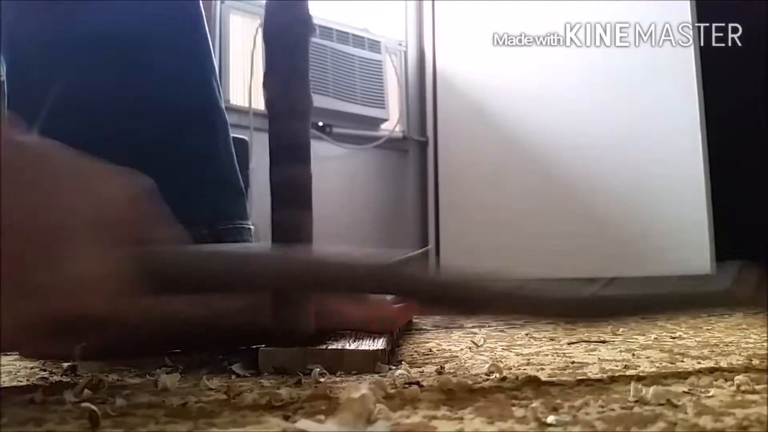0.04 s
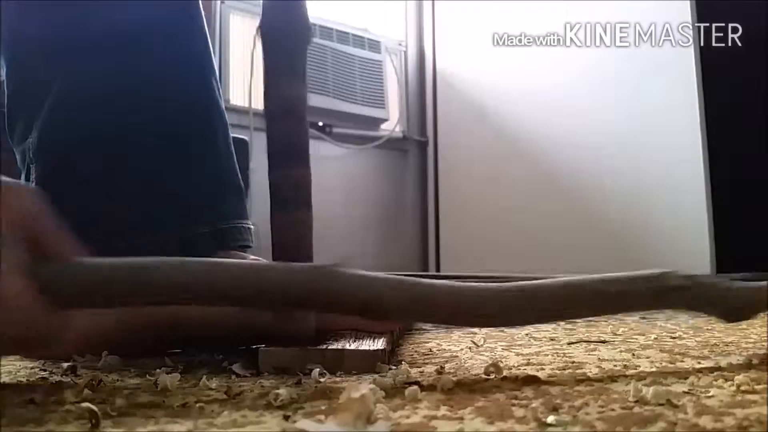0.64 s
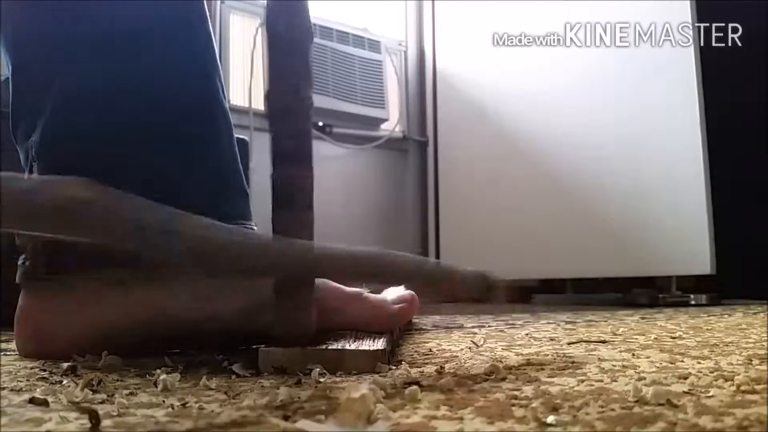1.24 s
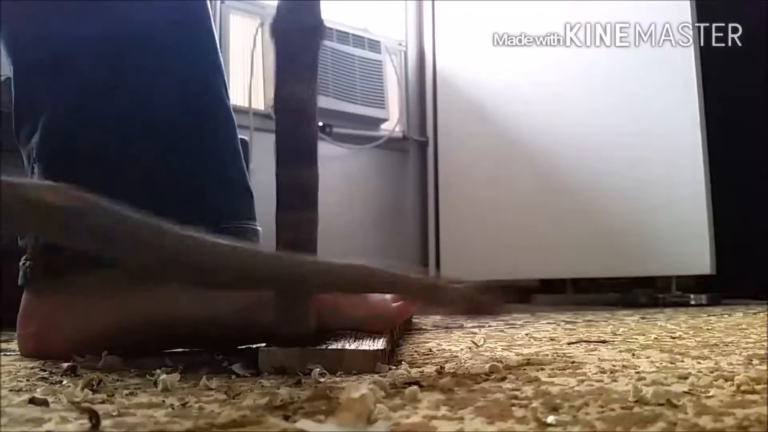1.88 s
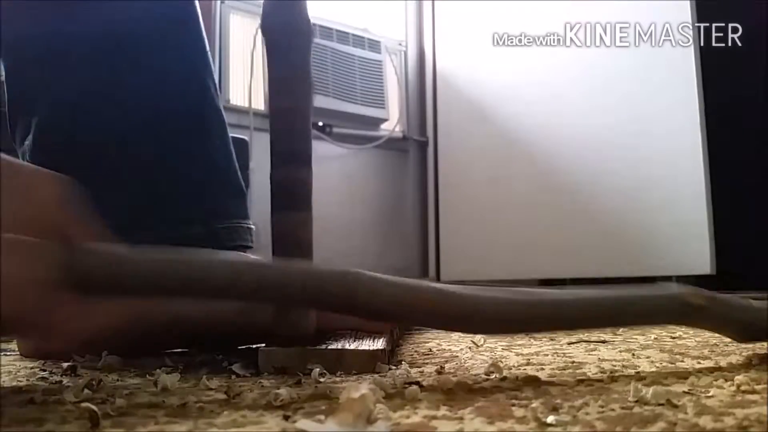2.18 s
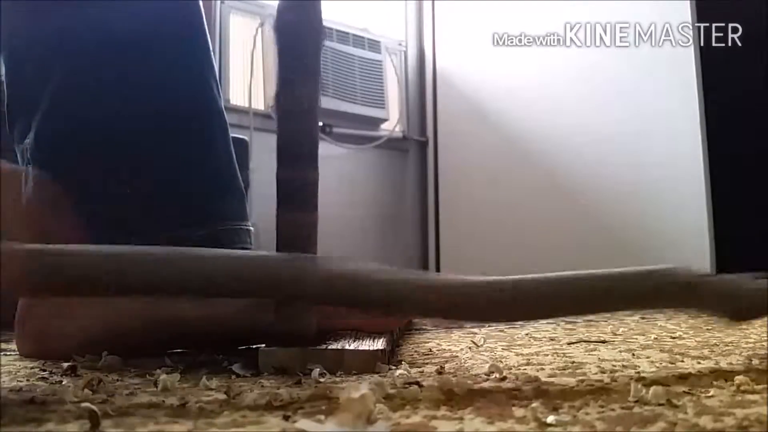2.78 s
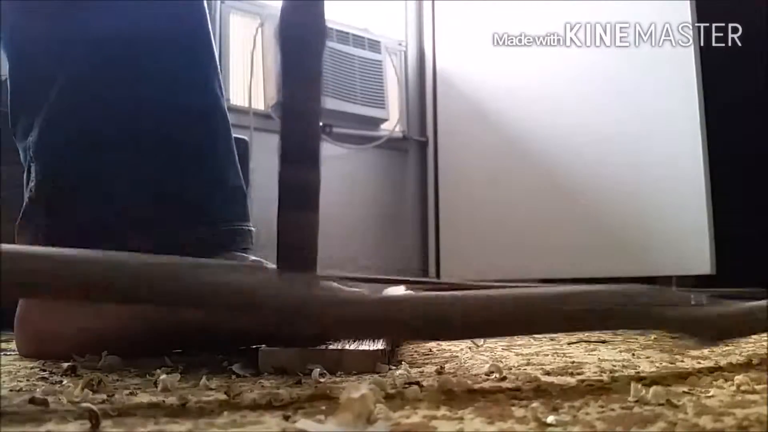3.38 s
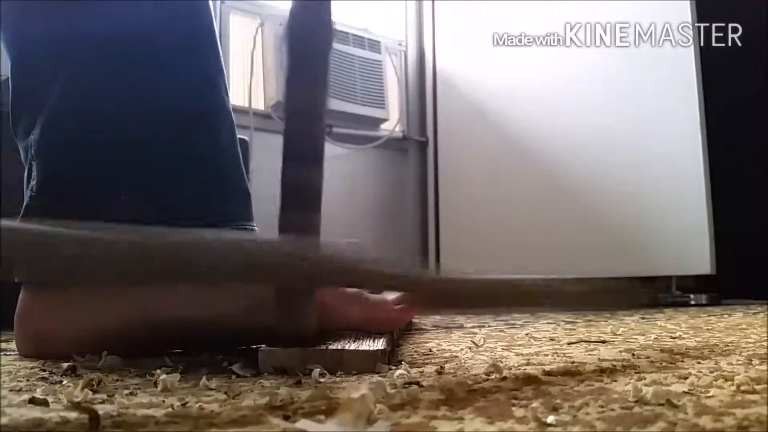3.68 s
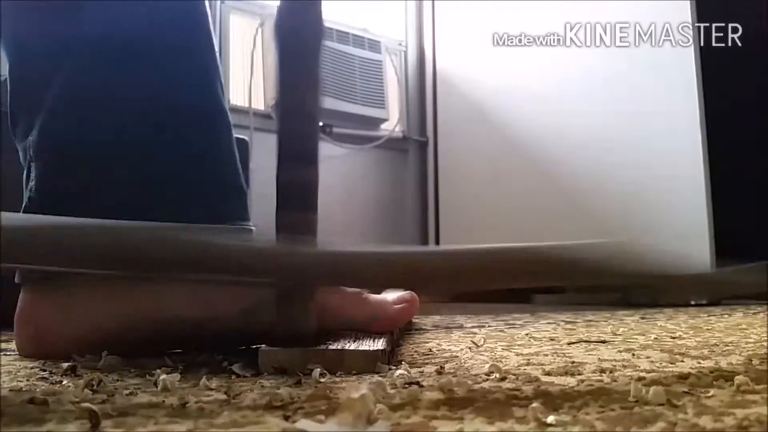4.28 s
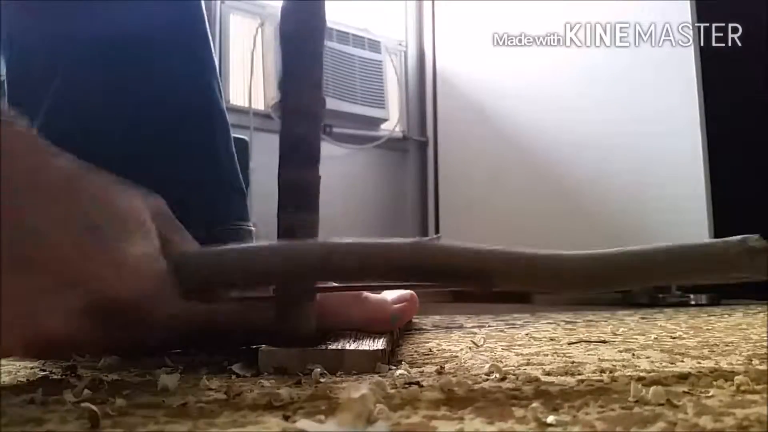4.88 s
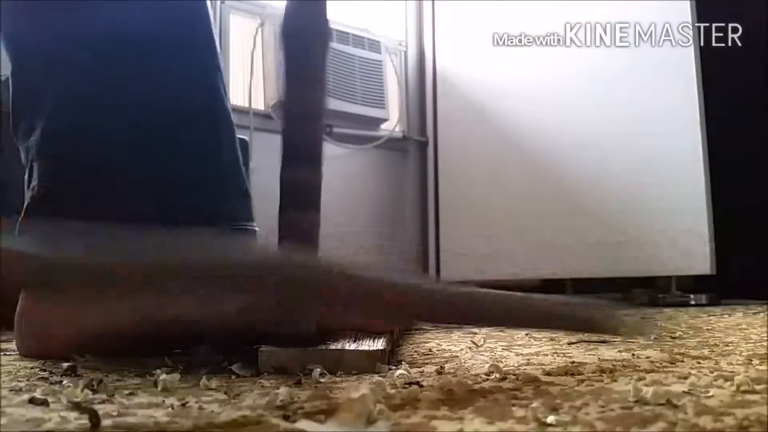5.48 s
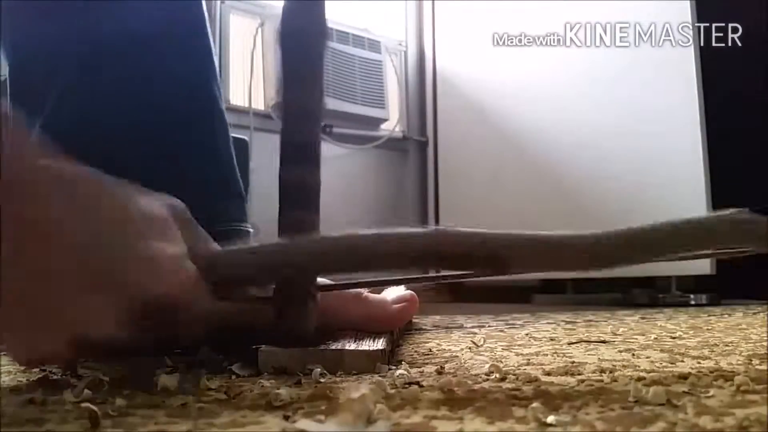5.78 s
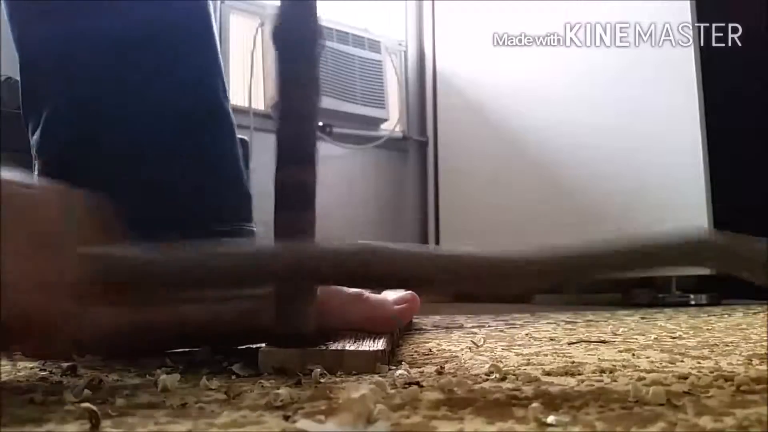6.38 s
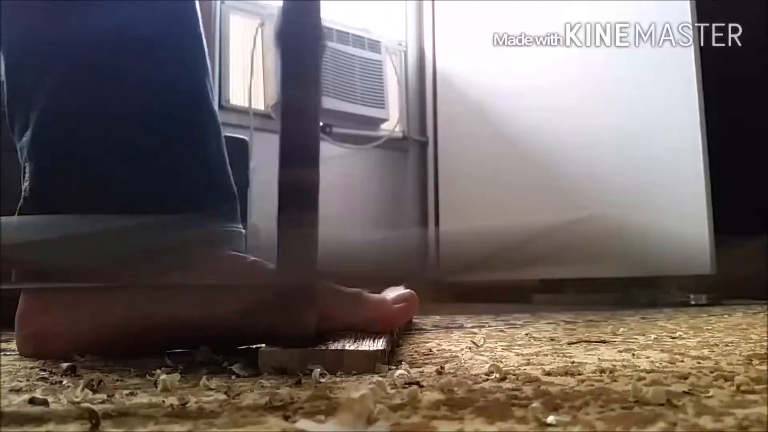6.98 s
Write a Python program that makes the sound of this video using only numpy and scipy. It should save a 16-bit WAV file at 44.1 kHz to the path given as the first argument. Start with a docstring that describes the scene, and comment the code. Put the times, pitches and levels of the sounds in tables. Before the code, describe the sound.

Rhythmic high squeaks of wood twisting on wood, one per bow stroke, over dusty rubbing and a low rumble in a small room.

```python
"""A bow drill is sawed back and forth on a wooden hearth board in a small room, near a phone on the floor.
From the start the spindle tip hisses in its dust and grabs about once a turn, squealing, while the board
rumbles and knocks on the floor. The first slow push strokes chatter, with a brief rest near 0.9 s.
The bow then quickens and squeals on every stroke; hard grabs sag in pitch and fall to the half tone, an
octave down, deepest near 5.7 s. At the end the bow eases off with a faint chatter and a last tiny squeak."""
import sys
import numpy as np
from scipy import signal
from scipy.fft import rfft, irfft
from scipy.io import wavfile

SR = 44100
rng = np.random.default_rng(int(sys.argv[2]) if len(sys.argv) > 2 else 0)


def dump(signal):
    """Clip the signal to [-1, 1] and save it as 16-bit WAV at the path in sys.argv[1]."""
    limited = np.clip(np.atleast_2d(signal).T, -1, 1)
    pcm = np.round(limited * 32767).astype(np.int16)
    wavfile.write(sys.argv[1], SR, pcm)


N = 310905
T = np.arange(N) / SR
FREQ = np.arange(N + 1) * SR / (2 * N)


# Squeal cues, each a first catch, a hard bite and a run of grabs:
# catch_s, bite_s, last_grab_s, grab_count, bite_pitch_hz, sag_hz, bite_level_db,
# then relative to the bite level: catch_db, last_grab_db, half_tone_db, octave_db, brightness_db
SQUEAL_CUES = [(-0.02, 0.012, 0.052, 2, 1933, 50, -19.5, -10, 0, -21, -13.5, -15),
               (0.591, 0.612, 0.64, 2, 2083, 16.5, -34.5, -10.5, -5, -9.5, -28, -14),
               (1.154, 1.213, 1.278, 3, 1767, -0.5, -23.5, -11, -17, 11, -16, -25),
               (1.459, 1.509, 1.591, 3, 2014, 99.5, -13, -17, -4, -5, -10.5, -11.5),
               (2.122, 2.165, 2.197, 2, 2056, 90, -16.5, -12, 2, -19, -13.5, -20),
               (2.443, 2.474, 2.538, 4, 1770, 180, -8.5, -7, -8, -2, -14, -22),
               (2.714, 2.751, 2.783, 2, 1998, 1, -11, -7.5, -1, -26, -10, -11),
               (2.997, 3.015, 3.12, 6, 1830, 65, -12.5, -12, -2.5, 0.5, -12, -23),
               (3.297, 3.312, 3.383, 4, 1978, 0, -13, -6.5, -7.5, -7, -6, -5),
               (3.592, 3.614, 3.66, 3, 1850, 10, -13, -3.5, -5, -6.5, -10, -14),
               (3.862, 3.9, 3.928, 2, 2103, -1, -14.5, -16, -8, -24, -14, -19),
               (4.156, 4.174, 4.236, 4, 1865, 40, -16, -4, -3, -3.5, -6.5, -12),
               (4.419, 4.442, 4.471, 2, 2135, 0, -17, -19.5, -16, -12, -18, -23),
               (4.642, 4.666, 4.76, 4, 1845, 190, -11, -8, -9, 0, -12, -19),
               (4.931, 4.952, 4.979, 2, 2076, 0, -11.5, -22.5, -3, -26, -8, -12.5),
               (5.17, 5.188, 5.259, 5, 1858, 50, -12.5, -2, -6, -1.5, -8.5, -14),
               (5.396, 5.431, 5.487, 3, 2043, 28.5, -12, -22, -4.5, -28.5, -6.5, -9),
               (5.6, 5.614, 5.717, 6, 1835, 590, -12.5, -3.5, -3, 1, -6.5, -14),
               (5.847, 5.864, 5.928, 3, 1853, -30, -15, -3, -6, -15, -3.5, -4),
               (6.085, 6.109, 6.178, 5, 1750, 330, -14, 0, -3, 3, -8.5, -19),
               (6.358, 6.395, 6.45, 3, 1896, -0.5, -14, -21, -13, -5.5, -5, -2.5),
               (6.918, 6.96, 7.01, 3, 2094, -1, -48, -2, -4, -10, -2.5, -3.5)]
def grabs(stall_sag_hz=1198, groan_sag_hz=552, release_rise_hz=60):
    """The tip catches, bites, then grabs evenly as the load rises and falls; a deep sag becomes a groan."""
    rows = []  # time_s, length_s, pitch_hz, level_db, half_tone_db, octave_db, brightness_db
    for cue in SQUEAL_CUES:
        catch_s, bite_s, last_s, count, hz, sag_hz, db, catch_db, last_db, half_db, octave_db, bright_db = cue
        turn_s = (last_s - bite_s) / (count - 1)
        # the first catch is higher, plainer and duller than the bite
        rows.append((catch_s, 0.008 + 0.28 * (bite_s - catch_s), hz + 115.2 + 4 * bright_db,
                     db + catch_db, half_db - 12, octave_db - 11, bright_db - 9))
        for progress in np.linspace(0, 1, int(count)):
            # the nearer a stall, the less the pitch recovers
            load = np.abs(np.sin(np.pi * progress / (1 + sag_hz / stall_sag_hz))) ** 1.8
            # a groan stretches the grab and moves its strength into the half tone and the rasp
            groan = sag_hz * load / groan_sag_hz
            unbuilt_db = -8.5 * (progress == 0)  # the half tone has not yet built up at the bite
            rows.append((bite_s + progress * (last_s - bite_s),
                         0.41 * turn_s * (1 + 0.15 * progress + 0.35 * load + groan),
                         hz - sag_hz * load + release_rise_hz * progress,
                         db + last_db * progress - 2.2 * load - 10.5 * groan,
                         half_db + unbuilt_db - 1.5 * (1 - load) + 11 * groan,
                         octave_db - 1.5 * load - 9 * groan,
                         bright_db + 0.3 * progress + 14 * groan))
    return rows


def grab_envelopes(sustain_db=-23, sustain_s=0.0272):
    """Each grab swells the tone, half tone, octave and treble, tightens the grip and bends the pitch."""
    tone, half, octave, bright, grip, bend = np.zeros((6, N))
    for time_s, length_s, _, db, half_db, octave_db, bright_db in grabs():
        near = np.abs(T - time_s) < .06
        age = (T[near] - time_s) / length_s
        swell = np.exp(-np.abs(age / .5) ** 2.33)
        # the tip goes on singing weakly between grabs
        sing = swell + undb(sustain_db) * (1 - swell) * np.exp(-((T[near] - time_s) / sustain_s) ** 2)
        # once the tone has built up the slips turn abrupt: the treble bites at once, then fades
        bite_age = np.maximum(age + 0.44, 0)
        bite = 1.18 * np.tanh(bite_age * 7) * np.exp(-(bite_age / 0.56) ** 2 / 2)
        tone[near] += (undb(db) * sing) ** 2
        half[near] += (undb(db + half_db) * sing) ** 2
        octave[near] += (undb(db + octave_db) * sing) ** 2
        bright[near] += (undb(db + bright_db) * bite) ** 2
        grip[near] = np.maximum(grip[near], swell)
        bend[near] += 2 * age * sing
    return *np.sqrt([tone, half, octave, bright]), grip, bend


def squeal(lock_db=-33, groan_hz=1270, throb_db=5, rasp_db=-6, crunch_db=-19, ring_db=-19):
    """Stick-slip tone of the tip; under load every second slip is weaker, which sounds the half tone."""
    tone, half, octave, bright, grip, bend = grab_envelopes()
    grab_s, _, grab_hz, *_ = np.transpose(grabs())
    pitch = np.interp(T, grab_s, grab_hz)
    # doubled slips are less regular, and a feeble grab never locks to one pitch
    doubled = half / (half + tone + 1e-6)
    unrest = 0.005 + 0.02398 * doubled + 0.035 / (1 + ((tone + half) / undb(lock_db)) ** 2)
    jitter = unrest * (0.78 * walk(700) + .7 * walk(140))
    # a tightening grip sticks longer and lowers the pitch
    hz = pitch * (1 + .03 * (.85 - grip) - 0.02 * bend + jitter)
    phase = 2 * np.pi * np.cumsum(hz) / SR
    core = tone * np.sin(phase) + octave * np.sin(2 * phase)
    growl = half * (np.sin(phase / 2) + undb(-16) * np.sin(1.5 * phase + 0.47 * walk(400))
                    + undb(-25) * np.sin(2.5 * phase))
    # the deepest groan doubles its period once more
    quarter = half * undb(-14) / (1 + (pitch / groan_hz) ** 20) * np.sin(phase / 4)
    upper = sum(undb(db + 2 * walk(350)) * np.sin(order * phase)
                for order, db in [(3, 1), (4, -4.5), (5, -15)])
    # the wood favours partials near 6 and 8.5 kHz
    wood_eq = gains([(4900, -11.5), (5750, -7), (6300, -1), (7200, -33), (8300, 0.5), (10500, -3)])
    upper = shape(bright * upper, wood_eq)
    splinters = noise() * (1 + np.cos(phase)) * undb(4.5 * walk(1200))
    rasp_eq = gains([(1000, -6), (2900, 7), (3800, -28), (4900, -5), (6000, 7), (7200, -14.5),
                     (8600, 5.5), (11500, 4), (15000, -14)])
    rasp = undb(rasp_db) * bright * unit(shape(splinters, rasp_eq))
    # the half tone crunches the dust across the whole band
    crunch_eq = gains([(300, -1.5), (480, -15), (900, 7), (2400, -8), (4000, -27), (5000, -7),
                       (9000, -6.5), (15000, -26)])
    crushed_dust = unit(shape(noise() * (1 + np.cos(phase / 2)), crunch_eq))
    crunch = undb(crunch_db) * half * crushed_dust * (groan_hz / pitch) ** 2
    # a plain squeal is smooth; in a doubled one, tone and half tone throb against each other
    throb = undb(throb_db * doubled * walk(220))
    voiced = np.sqrt(2) * ((core + upper) * throb + (growl + quarter) / np.sqrt(throb))
    return voiced + rasp + crunch + undb(ring_db) * tone * spindle(noise())


def spindle(push, ring_hz=3750, width_hz=220):
    """The narrow upper ring of the spindle, at rms 1."""
    return unit(shape(push, resonance(ring_hz, width_hz) ** 2))


# Juddering strokes: start_s, end_s, level_db, slips_per_s, full_speed_pitch_hz
CHATTER_CUES = [(0.202, 0.494, -28.5, 47, 710), (1.028, 1.331, -25, 33.4, 418),
                (1.736, 1.968, -32, 50, 820), (6.6, 6.79, -45.5, 45.75, 756.5)]
def chatter(scatter_db=2.15, slip_s=0.0053, creak_s=0.0054, creak_db=-2, rattle_db=20):
    """On slow pushes the tip judders: each slip rattles the board and creaks, higher with speed."""
    creaks, rattle = np.zeros((2, N))
    for start_s, end_s, db, slips_per_s, top_hz in CHATTER_CUES:
        count = int((end_s - start_s) * slips_per_s)
        for k, (late, loud, sharp) in enumerate(rng.standard_normal((count, 3))):
            time_s = start_s + (k + .5 + .2 * late) / slips_per_s
            speed = np.sin(np.pi * (k + .5) / count)
            near = np.abs(T - time_s) < .03
            age = T[near] - time_s
            size = undb(db + scatter_db * loud)
            hz = (300 + (top_hz - 300) * np.tanh(2.74 * speed ** 5)) * (1 + 0.082 * sharp)
            creak = np.exp(-(age / creak_s) ** 2) * np.sin(2 * np.pi * hz * age)
            creaks[near] += 2 * size * np.sqrt(speed) * creak
            decay = np.exp(-np.abs(age) / slip_s) * (age > 0)
            rattle[near] += size * speed ** 2 * (top_hz / 750) ** 2 * decay
    return undb(creak_db) * creaks + undb(rattle_db) * board(rattle * noise())


# Jolts of the board: start_s, peak_db
KNOCK_CUES = [(0.203, -21), (0.777, -35.5), (1.022, -26), (1.053, -17), (1.263, -19), (1.466, -30),
              (2.371, -25), (2.766, -27), (3.037, -27), (3.269, -26.5), (4.161, -28), (4.679, -30),
              (5.861, -34), (6.079, -25), (6.652, -25.5)]
def knocks(contact_s=0.00302):
    """Soft jolts thump the low modes of the board."""
    out = np.zeros(N)
    from_centre_s = T - 2 * contact_s
    thump = board(from_centre_s * np.exp(-(2 * from_centre_s / contact_s) ** 2))
    thump /= np.abs(thump).max()
    for start_s, peak_db in KNOCK_CUES:
        start = int(start_s * SR)
        out[start:] += undb(peak_db) * thump[:N - start]
    return out


# Body of the hearth board, one mode a row: pitch_hz, width_hz, level_db
BOARD_MODES = [(163, 73, 3), (321.4, 38, 10), (390, 27, -1), (776, 71, 10.5), (970, 39, -23),
               (1164, 40, -18), (1560, 86, -1.5), (1695, 50, 8)]
def board(push, soft_hz=2050):
    """A push rings the modes of the board; the soft wood passes little treble."""
    modes = sum(undb(db) * resonance(hz, width_hz) for hz, width_hz, db in BOARD_MODES)
    return shape(push, modes / (1 + (FREQ / soft_hz) ** 10))


# Bow strokes, pull and push in turn, with levels at full speed: start_s, hiss_db, rumble_db
BOW_STROKES = [(-0.12, -35.5, -26.5), (0.174, -38, -29.5), (0.498, -38, -30.5), (0.979, -45, -37.5),
               (1.39, -37, -31), (1.687, -38.5, -26.5), (2.022, -35, -28), (2.326, -36.5, -30.5),
               (2.608, -34, -29), (2.908, -35.5, -30), (3.205, -37.5, -34), (3.492, -41.5, -35.5),
               (3.768, -41, -36.5), (4.046, -44.5, -36.5), (4.32, -35.5, -32), (4.574, -37, -31.5),
               (4.832, -37, -35.5), (5.082, -38.5, -33.5), (5.324, -38, -33), (5.548, -37.5, -33.5),
               (5.787, -39, -32.5), (5.999, -39.5, -36), (6.266, -43, -37.5), (6.539, -46, -36),
               (6.818, -44.5, -37.5)]
def bow_envelopes(rest_s=0.85, finish_s=7.1, overlap_s=0.012, pull_db=-6, push_db=-2.2):
    """Hiss, rumble and scrape swell with the bow's speed; the push scrapes harder than the pull."""
    power = np.zeros((3, N))
    ends = [row[0] for row in BOW_STROKES[1:]] + [finish_s]
    for k, ((start_s, hiss_db, rumble_db), end_s) in enumerate(zip(BOW_STROKES, ends)):
        if start_s < rest_s < end_s:
            end_s = rest_s  # the bow stands still until the next stroke
        polish_db = -0.47 * start_s  # the socket is worn smooth
        scrape_db = rumble_db + (push_db if k % 2 else pull_db) + polish_db
        progress = np.clip((T - start_s + overlap_s) / (end_s - start_s + 2 * overlap_s), 0, 1)
        speed = np.abs(np.sin(np.pi * progress))
        levels = undb([hiss_db, rumble_db, scrape_db])[:, None]
        power += (levels * [speed ** 1.16, speed ** 0.72, speed ** 1.46]) ** 2
    return np.sqrt(power)


# EQ curves of the dust, the socket and the board on the floor: frequency_hz, level_db
DUST_EQ = [(1500, 12.5), (3000, -15), (3800, 6), (4800, -55), (6000, 15.5), (7200, -41), (8200, 4.5),
           (8750, 14.5), (9800, 6.5), (11600, 16.5), (13000, 5.5), (14500, 7.5), (16000, -11)]
SOCKET_EQ = [(150, -40), (260, -1.5), (370, 4.5), (500, -2.5), (700, -5), (950, -0.5), (1250, -14.5),
             (1700, -6), (2100, -13), (2700, -14.5), (3200, -49.5), (3750, -16), (4500, -59)]
FLOOR_EQ = [(25, -29), (50, -26.5), (80, -6.5), (120, -4.5), (165, 3.5), (200, -6.5), (250, -19),
            (400, -41.5)]
def rubbing(ring_db=-20, flutter_db=1.57, wobble_db=4, hiss_spread=0.2, rub_spread=0.43):
    """Dry friction: the dust hisses, the socket scrapes and the board rumbles; returns mid and side."""
    hiss, rumble, scrape = bow_envelopes()
    wobble = walk(60)  # the spindle is not quite round and presses unevenly
    mid_side = []
    for treble_share, bass_share in ((1, 1), (hiss_spread, rub_spread)):
        grains = noise() * undb(-0.5 * walk(2900))
        dust = unit(shape(grains, gains(DUST_EQ))) + undb(ring_db) * spindle(noise())
        dust *= hiss * undb(flutter_db * wobble)
        socket = unit(shape(noise(), gains(SOCKET_EQ))) * scrape * undb(-2 + wobble_db * wobble)
        floor = unit(shape(noise(), gains(FLOOR_EQ))) * rumble * undb(-1)
        mid_side.append(treble_share * dust + bass_share * socket + bass_share ** 1.56 * floor)
    return mid_side


# Stereo image at the two microphone ports: frequency_hz, left_minus_right_db, left_lead_rad
STEREO_IMAGE = [(60, 14.5, 0.5), (200, -0.5, 0), (394, 4, 1), (710, 2, 0.86), (810, 7.5, 0.8),
                (875, -3, 1.57), (1830, -1, 1.0), (2454, -8, 1.78), (2940, -2.5, 4), (3675, 0, 1.5),
                (4560, 1.5, 4), (5960, -11, 3.5), (7600, -8.5, 7), (9300, 8.5, 7.5), (11800, 3, 7.5),
                (12600, -8.5, 11.5), (15000, 11.5, 10)]
def ports(x):
    """The sound reaches the left port first, and its left-right balance shifts with pitch."""
    hz, db, lead_rad = np.transpose(STEREO_IMAGE)
    tilt = gains(np.transpose([hz, db]))
    right = np.sqrt(2 / (1 + tilt ** 2))
    lag = np.exp(-1j * np.interp(FREQ, hz, lead_rad))
    return np.array([shape(x, tilt * right), shape(x, right * lag)])


def room(x, t60_s=0.38, first_echo_s=0.0068, build_s=0.0023):
    """Dense echoes of a small room; the bass is alike on both sides and the treble is wide."""
    t = T[:SR]
    envelope = undb(-60 * t / t60_s) * np.clip((t - first_echo_s) / build_s, 0, 1)
    low_eq = gains([(100, 5), (2200, 1), (4200, 0), (7000, -28.5), (15000, -22)])
    high_eq = gains([(2000, -44), (4000, 5.5), (6200, 2), (9000, -5.5), (15000, 1.5)])
    echoes = []
    for _ in range(2):
        tail = (shape(noise(), low_eq) + shape(noise(), high_eq))[:SR] * envelope
        echoes.append(signal.fftconvolve(x, tail / np.sqrt(SR * t60_s / np.log(1e6)))[:N])
    likeness = 1 / (1 + (FREQ / 900) ** 2)
    mid = shape(echoes[0], np.sqrt((1 + likeness) / 2))
    side = shape(echoes[1], np.sqrt((1 - likeness) / 2))
    return np.array([mid + side, mid - side])


def air():
    """A steady, dark bed of room air, separate on each side."""
    air_eq = gains([(30, -12), (150, 12), (400, 16.5), (2000, -5), (15000, -29)])
    return np.array([unit(shape(noise(), air_eq)) for _ in range(2)])


def undb(db):
    """Decibels to gain."""
    return 10 ** (np.asarray(db) / 20)


def unit(x):
    """Scale to rms 1."""
    return x / np.sqrt(np.mean(x ** 2))


def gains(points):
    """EQ curve through (frequency_hz, level_db) points."""
    hz, db = np.transpose(points)
    return undb(np.interp(np.log(FREQ + 1), np.log(hz), db))


def resonance(hz, width_hz):
    """Frequency response of one mode, gain 1 at its centre."""
    return 1j * FREQ * width_hz / (hz ** 2 - FREQ ** 2 + 1j * FREQ * width_hz)


def shape(x, response):
    """Filter by a frequency response."""
    return irfft(rfft(x, 2 * N) * response)[..., :N]


def noise():
    """White noise."""
    return rng.standard_normal(N)


def walk(rate_hz):
    """Random modulation of rms 1, gliding to a new value rate_hz times a second."""
    return unit(np.interp(T * rate_hz, np.arange(N // 8), rng.standard_normal(N // 8)))


def scene(squeal_db=2.5, squeal_send_db=-7, wood_send_db=-12, air_db=-58):
    """The squeal up front, wood noises under it, both sent to the room, over faint air."""
    voice = undb(squeal_db) * squeal()
    rub_mid, rub_side = rubbing()
    wood = rub_mid + chatter() + knocks()
    bed = undb(air_db) * air()
    echoes = room(undb(squeal_send_db) * voice + undb(wood_send_db) * wood)
    return ports(voice + wood) + np.array([rub_side, -rub_side]) + echoes + bed


def record(dry, ceiling=.9, top_hz=15450):
    """The phone rounds the loudest peaks and cuts the top."""
    rounded = dry / (1 + (dry / ceiling) ** 6) ** (1 / 6)
    return signal.sosfilt(signal.ellip(10, .2, 80, top_hz, fs=SR, output="sos"), rounded)


dry = scene()
out = record(dry)
dump(out)
```